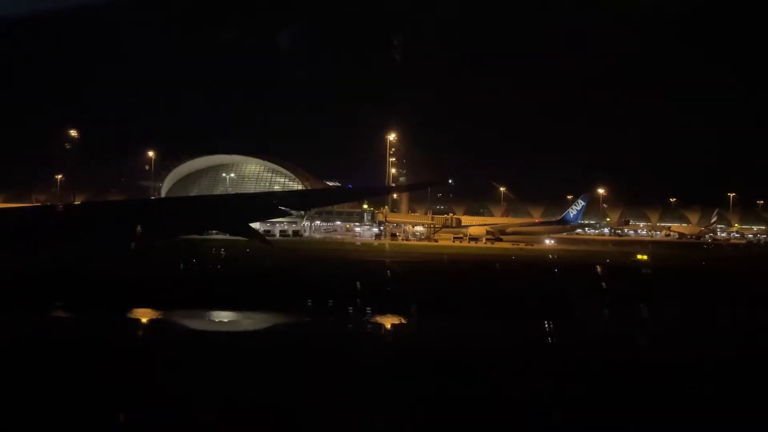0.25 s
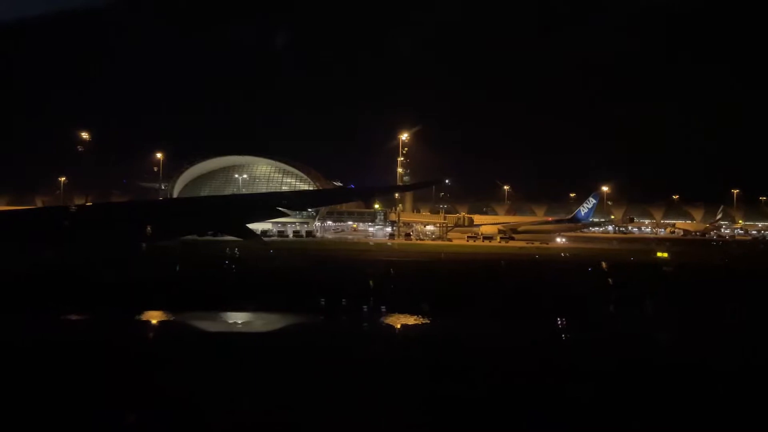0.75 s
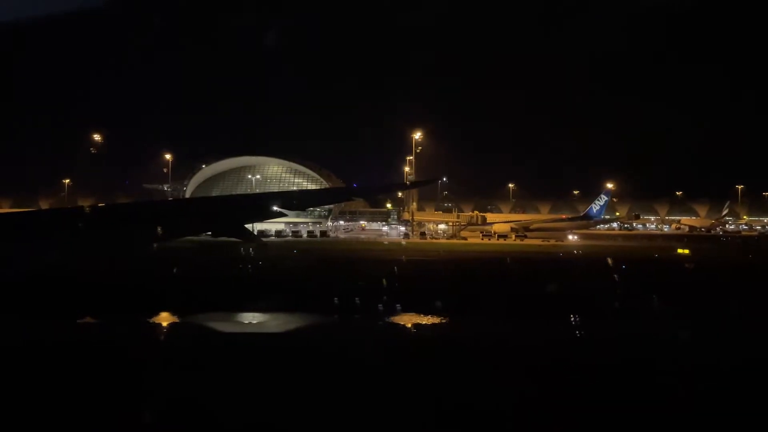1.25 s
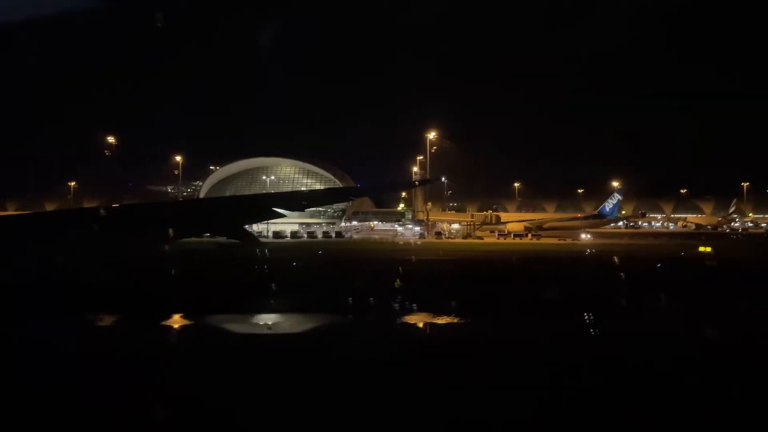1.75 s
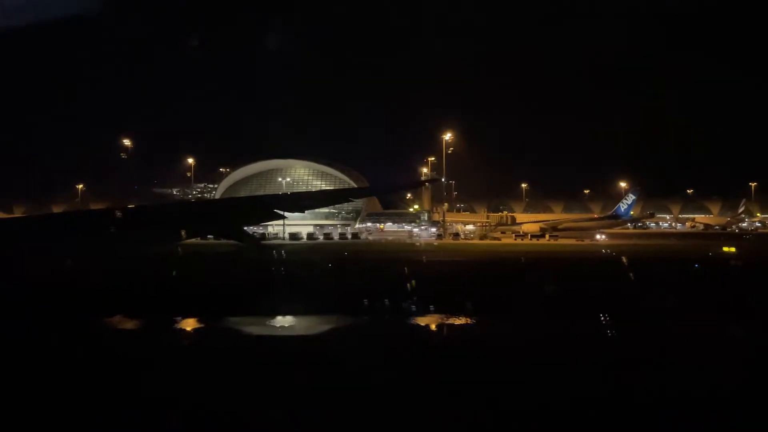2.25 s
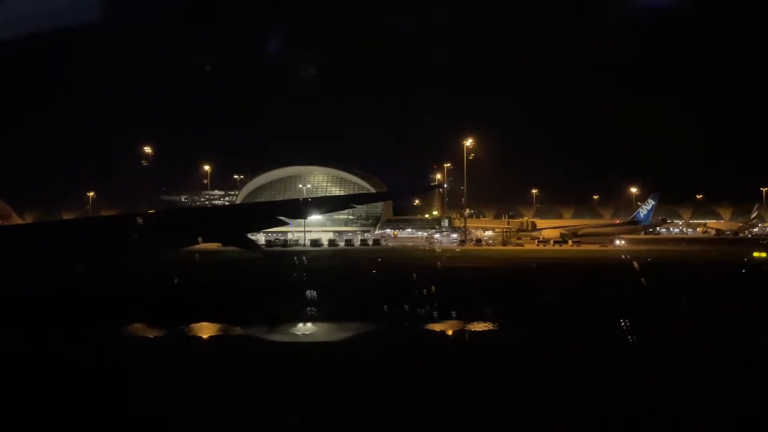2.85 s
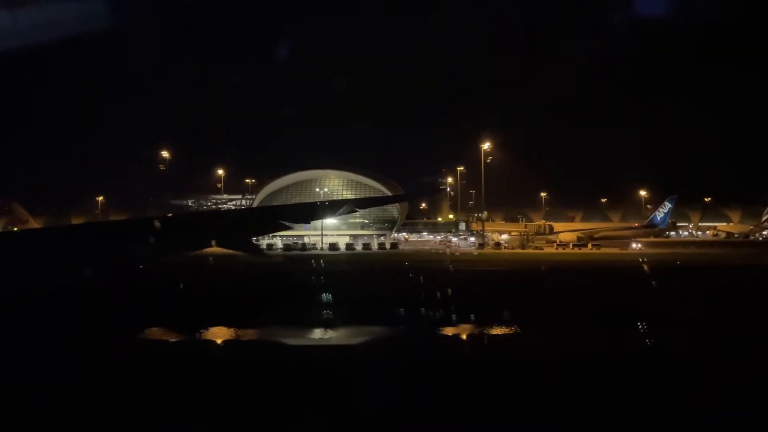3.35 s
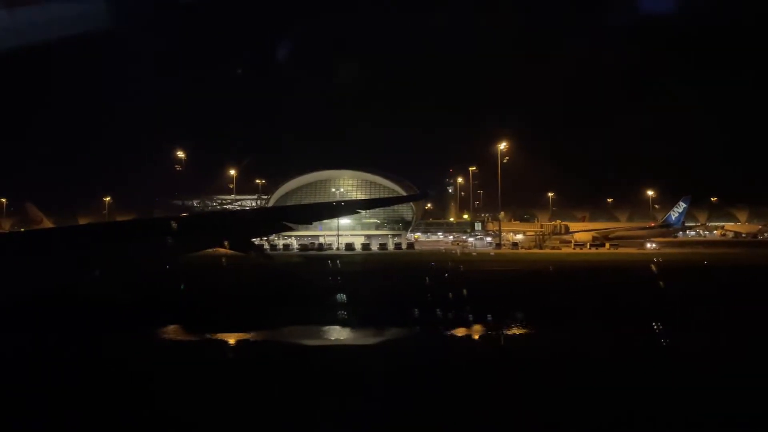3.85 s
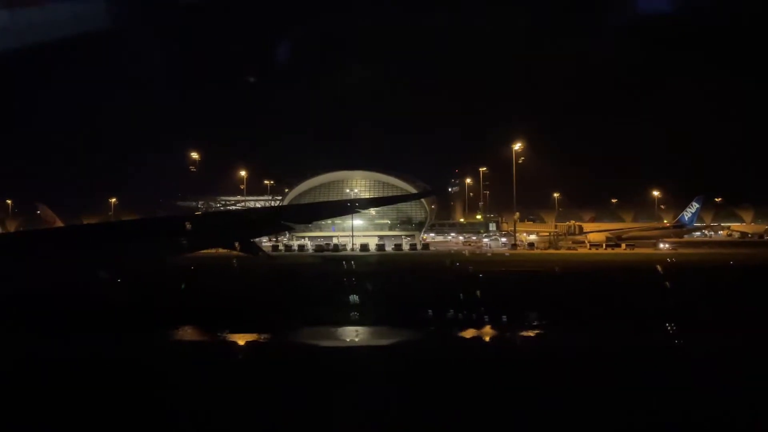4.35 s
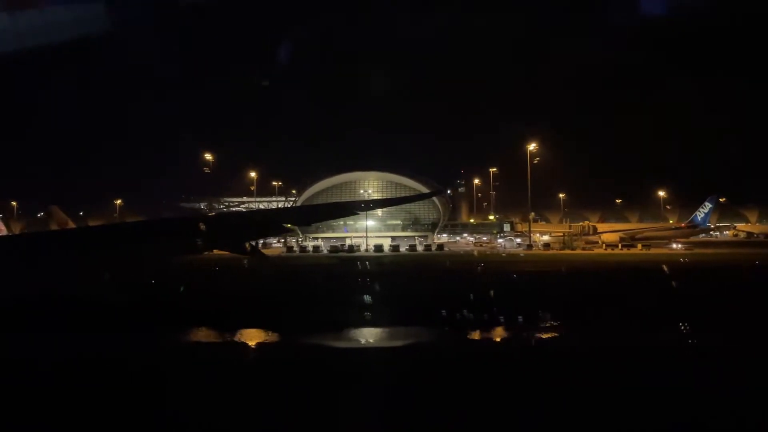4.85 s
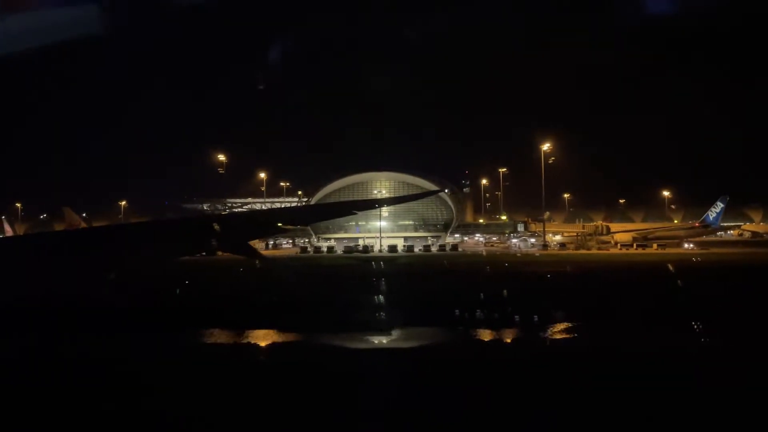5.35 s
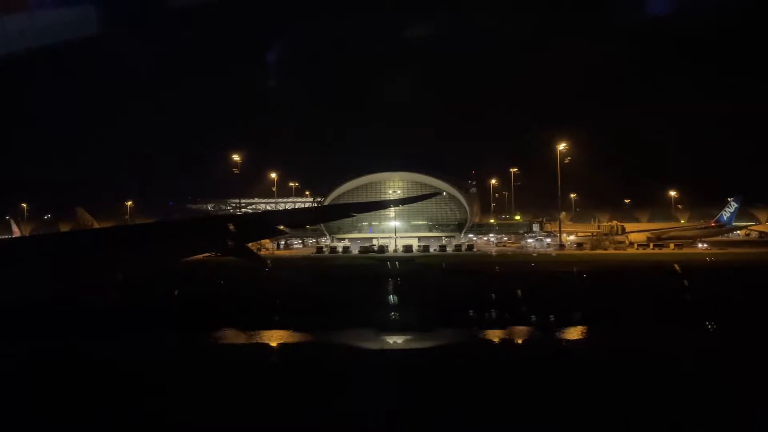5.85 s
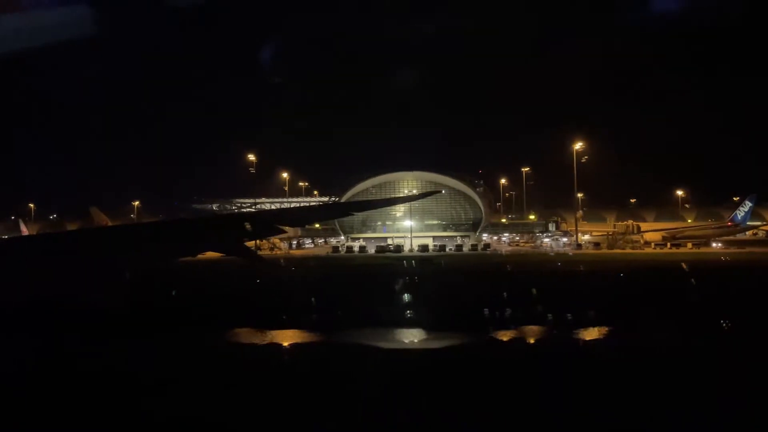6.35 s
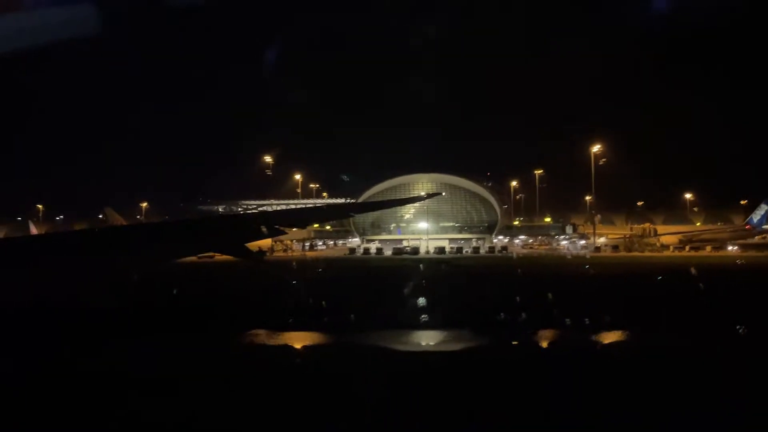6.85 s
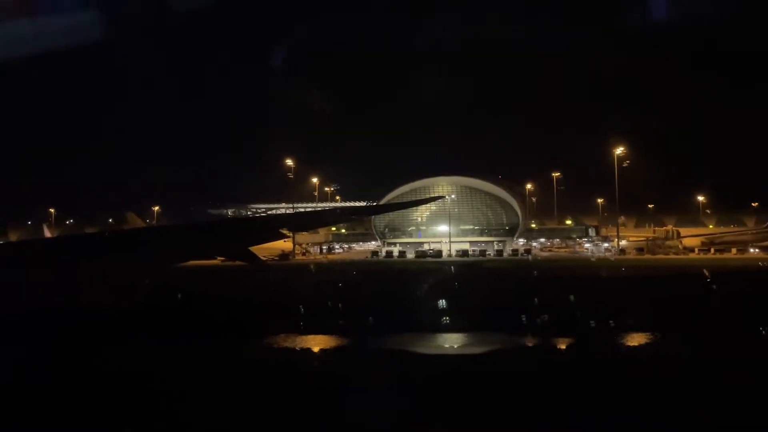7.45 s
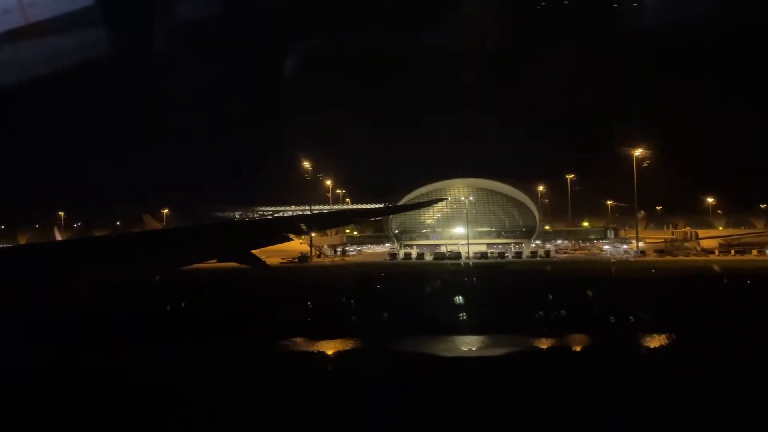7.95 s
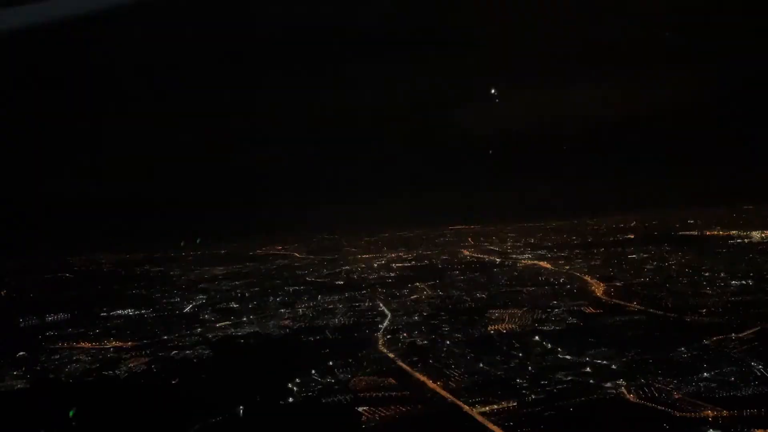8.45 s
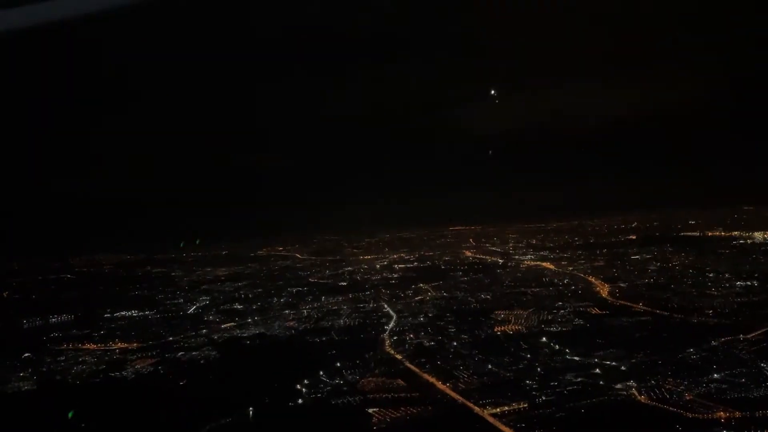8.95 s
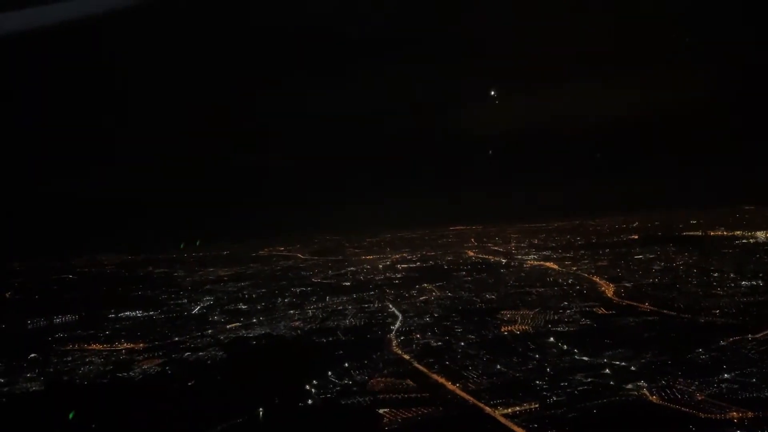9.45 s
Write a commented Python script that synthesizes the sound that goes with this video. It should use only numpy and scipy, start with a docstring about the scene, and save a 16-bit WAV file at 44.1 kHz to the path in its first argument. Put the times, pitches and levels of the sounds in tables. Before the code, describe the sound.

Heard from a window seat in a jet cabin: tyres rumble steadily and thud over pavement joints, two idling engines hum in a slow beat, pumps drone on the right and vents hiss. Rough pavement briefly rattles the trim. Near the end a click cuts abruptly to the climb, a far louder, buffeting low roar with thin whine. The stereo microphone sits inside the cabin.

```python
"""Airliner window seat, taxi and climb

A jet airliner taxis: wheels rumble and thud over joints, two idling engines hum in a slow beat, pumps drone to
the right, vents hiss and rough pavement shakes the trim. With a click the scene jumps to the climb: a buffeting
roar under thin fan whine. Shaped noise, coloured by the cabin, makes rumble, roar, hiss and rustle; wavering
sines make the rotating parts and low swells; envelopes place the thuds, rattles, squeaks and ticks."""
import sys
import numpy as np
from scipy import signal
from scipy.fft import rfft, irfft
from scipy.io import wavfile
from scipy.ndimage import uniform_filter1d

SR = 44100
rng = np.random.default_rng(int(sys.argv[2]) if len(sys.argv) > 2 else 0)


def digitize_waveform(pressure):
    """Quantize a signal to 16-bit integers and store it at the path in sys.argv[1].

    Rows of a 2-D input are taken as channels; values are limited to [-1, 1].
    """
    field = np.atleast_2d(pressure).T
    bounded = np.clip(field, -1, 1)
    quanta = np.round(bounded * 32767).astype(np.int16)
    wavfile.write(sys.argv[1], SR, quanta)


N = 427329
T = np.arange(N) / SR  # s
HZ = np.fft.rfftfreq(N, 1 / SR)
JUMP_S = 8.4143  # taxi gives way to climb
RATTLE_RISE_S, RATTLE_DECAY_S = 0.016, 0.023


def gain_of(db):
    """Decibels to amplitude."""
    return 10 ** (np.asarray(db) / 20)


def evened(x):
    """Scales to rms 1."""
    return x / np.sqrt(np.mean(x ** 2) + 1e-20)


def read(points, column=1):
    """One column of a frequency table, interpolated on a log frequency axis."""
    table = np.array(points, float)
    return np.interp(np.log(HZ + 1), np.log(table[:, 0] + 1), table[:, column])


def drift(rate_hz):
    """Slow random wandering of rms 1: noise behind a Gaussian low-pass."""
    count = 2048
    hz = np.fft.rfftfreq(count, T[-1] / count)
    lowpass = np.exp(-(hz / rate_hz) ** 2)
    slow = irfft(rfft(rng.standard_normal(count)) * lowpass, count)
    return evened(np.interp(T, np.linspace(0, T[-1], count), slow))


def swell(start, hold, rise, decay):
    """An envelope that is fully up at start, holds, then dies away exponentially (all in s)."""
    attack = np.clip((T - start) / rise + 1, 0, 1)
    return attack * np.exp(-np.maximum(T - start - hold, 0) / decay)


def together(floor_db, envelopes):
    """Adds envelopes to a steady floor, power by power."""
    return np.sqrt(gain_of(floor_db) ** 2 + sum(envelope ** 2 for envelope in envelopes))


def beating(beat_hz, in_step_s, depth):
    """Strength of the joint note of two rotating parts that turn slightly out of step."""
    return abs(1 + depth * np.exp(2j * np.pi * beat_hz * (T - in_step_s)))


def cabin_noise(spectrum_db, lean=0.93, left_db=0., spread=0., resonant=1):
    """Noise coloured by cabin resonances at two microphones: nearly one pressure in the bass, looser above."""
    # cabin air and panel resonances and the gaps between, before resonant: [f/Hz, width/Hz, level/dB]
    cabin_modes = [(173, 8, -3), (187, 9, -7), (204, 15, 6), (229, 14, -3), (249, 9, 4.5), (260, 7, -3.5),
                   (272, 14, 3.5), (289, 9, -3.5), (357, 14, -3), (420, 14, -2), (502, 16, 1),
                   (565, 30, -1.5), (604, 24, 3), (680, 50, 1), (770, 80, -1.5), (1070, 170, -2.2),
                   (1255, 110, 2.4), (1370, 70, -1), (1660, 130, 2.2), (1855, 80, -3.2), (1990, 220, 2.4),
                   (2780, 120, -1.5)]
    # how the field reaches the microphones, before lean and spread:
    # [f/Hz, likeness 0-1, left lead/rad, left minus right/dB]
    ports = [(40, 0.998, -0.0, 0.3), (130, 0.987, 0.19, -0.6), (205, 0.96, 0.38, 1.3),
             (240, 0.96, 0.5, 0.1), (275, 0.89, 0.17, -0.7), (330, 0.85, 0.62, -5.2),
             (390, 0.79, 0.53, -2.1), (440, 0.24, 3.53, 2.3), (500, 0.45, 1.84, 6.3),
             (620, 0.44, 2.02, 5.9), (720, 0.42, 1.05, 1.6), (1020, 0.21, 3.17, 1.5),
             (1290, 0.59, 0.05, -1.2), (1550, 0.15, 0.13, 0.1), (1800, 0.22, 0.23, -6.0),
             (2080, 0.44, 0.05, 1.1), (2400, 0.62, 0.36, -0.7), (3200, 0.51, 0.69, -0.5),
             (4100, 0.24, 2.02, -0.6), (4900, 0.41, 0.33, -0.5), (5900, 0.09, -1.75, 0.1),
             (6600, 0.51, -2.9, -0.2), (7500, 0.89, -3.28, -0.1), (8500, 0.74, -3.9, 0.0),
             (9500, 0.63, -5.06, 0.1), (10500, 0.95, -6.23, 0.0), (12100, 0.77, -6.42, 0.1),
             (12900, 0.45, -8.13, -0.1), (14000, 0.96, -9.38, 0.0)]
    a, b = rng.standard_normal((2, len(HZ))) + 1j * rng.standard_normal((2, len(HZ)))
    modes_db = sum(db / (1 + (2 * (HZ - hz) / width) ** 2) for hz, width, db in cabin_modes)
    same, lead, balance_db = (read(ports, column) for column in range(1, 4))
    same = np.clip(same * (1 - spread), 0, 1)
    tilt = gain_of((lean * balance_db + left_db) / 2)  # standing waves favour one side
    right = (same * a + np.sqrt(1 - same ** 2) * b) * np.exp(-1j * lead)
    pair = np.array([a * tilt, right / tilt]) / np.hypot(tilt, 1 / tilt)
    return evened(irfft(pair * gain_of(spectrum_db + resonant * modes_db), N))


def steadied(x, seconds):
    """Holds the short-term power of a noise near 1, so that its swells come from its drive."""
    power = uniform_filter1d((x ** 2).mean(0), max(int(seconds * SR), 2))
    return x / np.sqrt(power + 1e-9)


def tone(hz, lead, waver, flutter):
    """A narrow note, as of a rotating part: its pitch wanders a little and its strength flutters."""
    phase = 2 * np.pi * np.cumsum(hz * (1 + waver * drift(2.95))) / SR
    strength = 1 + flutter * (drift(4) + 1j * drift(4))  # turbulence
    ears = np.exp(1j * np.array([phase, phase - lead]))
    return evened((strength * ears).real)


def tones(table, waver, flutter):
    """Several rotating parts together."""
    return sum(gain_of(db) * tone(hz, lead, waver, flutter) for hz, db, lead in table)


def wheels(tyres_db=-37.0, smooth_boom_db=-38):
    """Tyres rumble steadily; joints and rough stretches make the landing gear boom and the hull drone."""
    # tyre rumble: [f/Hz, level/dB per Hz]
    tyre_spectrum = [(15, -35), (21, -6), (30, -1), (43, -16), (80, -2), (100, -5), (122, -1), (155, -7.5),
                     (185, -4), (230, -17.5), (400, -44), (2000, -89)]
    # landing gear boom: [f/Hz, level/dB per Hz]
    gear_spectrum = [(20, -36), (42, -4.5), (52, -4.5), (62, 1), (72, -3), (86, -13.5), (130, -33),
                     (600, -102)]
    # hull drone on rough pavement: [f/Hz, level/dB per Hz]
    hull_spectrum = [(120, -1), (210, 0.5), (310, -3.5), (380, -5.5), (500, -11), (900, -31), (3000, -60)]
    # pavement joints that thud through the gear: [t/s, level/dB]
    bumps = [(0.86, -30), (1.72, -28.5), (1.89, -28.5), (2.43, -35), (2.88, -30), (3.05, -37), (3.58, -45),
             (4.24, -34), (4.41, -37), (5.13, -35), (5.43, -28), (5.7, -37), (6.09, -32), (6.55, -37),
             (6.72, -27), (6.93, -29), (7.17, -29), (7.42, -27), (7.8, -28.5), (8.18, -31)]
    rumble = gain_of(tyres_db) * steadied(cabin_noise(read(tyre_spectrum)), seconds=0.16)
    thuds = [gain_of(db) * swell(s, 0, rise=0.028, decay=0.1) for s, db in bumps]
    jolting = together(smooth_boom_db, thuds + [roughness(column=2)])
    boom = jolting * steadied(cabin_noise(read(gear_spectrum)), seconds=0.11)
    drone = roughness(column=3) * steadied(cabin_noise(read(hull_spectrum)), seconds=0.17)
    return rumble + drone + boom


def roughness(column):
    """Envelope of the rough pavement, at the levels in one column of its table."""
    # rough stretches: [t/s, length/s, gear boom level/dB, hull drone level/dB, trim rustle level/dB]
    rough_patches = [(0.973, 0.15, -55, -53, -52), (6.586, 0.26, -32.5, -36.5, -55.5),
                     (6.923, 0.3, -39, -37, -53)]
    power = 0
    for patch in rough_patches:
        envelope = swell(patch[0], patch[1], rise=0.044, decay=0.069)
        power = power + (gain_of(patch[column]) * envelope) ** 2
    return np.sqrt(power)


def idling_engines(exhaust_db=-34.0):
    """Exhaust noise that surges slightly with each wheel turn, the hum of the shafts and a faint whine."""
    # exhaust noise: [f/Hz, level/dB per Hz]
    exhaust_spectrum = [(110, -14.5), (180, -6.5), (215, -1.5), (255, -3), (300, -2), (345, -8), (375, -10),
                        (435, -14), (500, -15), (570, -22.5), (690, -22), (790, -26.5), (1100, -36.5),
                        (4000, -85)]
    # steady engine tones: [f/Hz, level/dB, left lead/rad]
    idle_whine = [(30.8, -48, 0.11), (388, -60, 1.3), (468, -69, 1.6), (540, -69, 2.1), (904, -76, 1.3)]
    wheel_rate_hz, trough_s = 1.615, 3.92
    surge_db = -0.3 * np.cos(2 * np.pi * wheel_rate_hz * (T - trough_s))
    exhaust = gain_of(exhaust_db + surge_db) * steadied(cabin_noise(read(exhaust_spectrum)), seconds=0.25)
    return exhaust + shaft_hum() + tones(idle_whine, waver=0.002, flutter=0.7)


def shaft_hum():
    """The two engines' shafts drift in and out of step over several seconds."""
    hum = tone(hz=132.9, lead=.21, waver=.0012, flutter=.07)
    return gain_of(-41.2) * beating(beat_hz=.17, in_step_s=3.5, depth=.47) * hum


def noise_swells(half_width_s=0.06):
    """Brief narrow low swells in the noise, each around one pitch."""
    # swells: [t/s of the crest, f/Hz, level/dB]
    brief_swells = [(.49, 248, -40), (.6, 204, -33.5), (1.24, 204, -38.5), (1.42, 205, -36.5),
                    (2.35, 279, -35.5), (2.36, 206, -33), (2.77, 207, -36.5), (3.62, 270, -35.5),
                    (4.14, 206, -35.5), (4.37, 281, -38.5), (5.3, 248, -35.5), (5.47, 214, -37),
                    (6.25, 267, -37.5), (6.81, 206, -40), (7.13, 268, -34.5)]
    out = 0
    for s, hz, db in brief_swells:
        envelope = np.exp(-((T - s) / half_width_s) ** 2)
        out = out + gain_of(db) * envelope * tone(hz, lead=0.25, waver=0.0058, flutter=0.083)
    return out


def pump_hum(growth_db_per_s=.6):
    """Two hydraulic pumps drone somewhere to the right, beating about once a second and slowly growing."""
    # starting level before the beat, one row each for left and right: [level/dB]
    pump_db = [
        [-51.7],
        [-44.7],
    ]
    level = gain_of(np.array(pump_db) + growth_db_per_s * T)
    drone = level * tone(hz=321.3, lead=.6, waver=.0003, flutter=.08)
    return beating(beat_hz=0.884, in_step_s=4.45, depth=0.25) * drone


def climbing_engines(buffet_db=0.4, boom_share=.3):
    """Jet roar booming in the hull, buffeted by the airflow, with engine tones on top."""
    # rush of the jet: [f/Hz, level/dB per Hz]
    climb_spectrum = [(15, -46), (26, -37), (38, -15.5), (50, -9.5), (70, -8), (97, -4.5), (135, 0),
                      (158, -1.5), (180, -3.5), (205, -13.5), (240, -12.5), (330, -19), (470, -27.5),
                      (950, -44.5), (6000, -92.5)]
    # roar as the airflow buffets the hull: [t/s, level/dB]
    roar_level = [(8.45, -21.5), (8.53, -19.5), (8.6, -21.5), (8.75, -20), (8.89, -20), (8.94, -23.5),
                  (9.05, -20), (9.15, -19.5), (9.26, -21.5), (9.46, -19.5), (9.57, -22), (9.67, -19)]
    # steady engine tones: [f/Hz, level/dB, left lead/rad]
    climb_whine = [(37.7, -39, 0), (202, -42, .3), (642, -64, 1.6), (1136, -71, .5), (1416, -73, .5),
                   (1873, -77, .5), (2799, -82, .5), (4716, -82, .5), (5895, -83, 1)]
    rush = cabin_noise(read(climb_spectrum), lean=0.38, left_db=0.8, spread=0.02, resonant=.45)
    rush = steadied(rush, seconds=0.07)
    # the hull's boom wanders around one pitch, a little stronger on the left
    boom = gain_of([[.6], [-.6]]) * tone(hz=134, lead=.2, waver=.075, flutter=.3)
    # boom_share is a share of the power
    roar = steadied(np.sqrt(1 - boom_share) * rush + np.sqrt(boom_share) * boom, seconds=.045)
    level_db = np.interp(T, *np.transpose(roar_level)) + buffet_db * drift(15)
    return gain_of(level_db) * roar + fan_beats() + tones(climb_whine, waver=0.0012, flutter=0.25)


def fan_beats():
    """The two engines turn slightly out of step, so their notes swell and fade, mostly on the left."""
    # joint notes: [f/Hz, level before beat and balance/dB, beat rate/Hz, in step at t/s, depth 0-1]
    climb_beats = [(855.5, -58, 1.68, 8.65, .95), (705.5, -57, 2.8, 9.0, .5)]
    notes = 0
    for hz, db, rate, in_step, depth in climb_beats:
        note = tone(hz, lead=1.63, waver=0.0012, flutter=0.18)
        notes = notes + gain_of(db) * beating(rate, in_step, depth) * note
    return gain_of([[1.2], [-1.8]]) * notes


def ventilation(climbing, taxi_db=-50.0, climb_db=-48.5, fan_hz=2358.3):
    """Air from the vents: on the ground the ducts whine and the fan whistles; the climb leaves mostly hiss."""
    # vent hiss in the taxi: [f/Hz, level/dB per Hz]
    taxi_vents = [(300, -5.5), (1000, 1), (1270, -0.5), (1500, -1), (1750, -1.5), (1850, -4.5), (2450, -10),
                  (3100, -10.5), (4300, -15), (5100, -15.5), (5950, -12), (6800, -21), (8500, -24),
                  (11000, -32.5), (15000, -37)]
    # vent hiss in the climb: [f/Hz, level/dB per Hz]
    climb_vents = [(300, -0.5), (1100, 2), (1700, -2.5), (2400, -11.5), (2900, -10.5), (3400, -12),
                   (3800, -15), (5300, -15.5), (5920, -15.5), (6250, -16.5), (7500, -32), (8000, -26.5),
                   (11000, -32), (15000, -40)]
    # breathy, wavering duct whines: [f/Hz, level/dB, left lead/rad, waver share]
    duct_whines = [(1255, -69.5, .1, .022), (1680, -69, .1, .02), (7095, -81, 3, .0025)]
    # ventilation fan: [multiple of fan_hz, level/dB, left lead/rad]
    fan_overtones = [(1, -76.5, 1.1), (2, -85, 5.3)]
    # thin whistles of the air nozzles: [f/Hz, level/dB, left lead/rad]
    squeal = [(8123, -90, 2.7), (10255, -96, 0), (11795, -97, 0), (12334, -101, 0)]
    hiss = gain_of(taxi_db + 0.31 * drift(10.0)) * cabin_noise(read(taxi_vents))
    whine = sum(gain_of(db) * tone(hz, lead, waver, flutter=3) for hz, db, lead, waver in duct_whines)
    fan_table = [(multiple * fan_hz, db, lead) for multiple, db, lead in fan_overtones]
    fan = tones(fan_table, waver=0.00077, flutter=0.8)
    grounded = hiss + whine + fan
    aloft = gain_of(climb_db) * cabin_noise(read(climb_vents), spread=0.25, resonant=0.31)
    whistles = tones(squeal, waver=0.00022, flutter=0.57)
    return (1 - climbing) * grounded + climbing * aloft + whistles


def high_hiss():
    """For two stretches of the taxi the high hiss is lifted near 6 and 9 kHz."""
    # lifted hiss: [f/Hz, level/dB per Hz]
    high_spectrum = [(4500, -22), (5800, 6), (7300, -18), (8400, -11), (9100, 5), (9900, -7), (12000, -40)]
    # stretches of brighter hiss: [t/s, length/s, level/dB]
    bright_stretches = [(0, 1.25, -77), (7.7, .65, -75)]
    lift = sum(gain_of(db) * swell(s, length, rise=.12, decay=.12) for s, length, db in bright_stretches)
    return lift * cabin_noise(read(high_spectrum))


def fittings(smooth_rustle_db=-63, uneven_db=4.5):
    """The trim rustles faintly throughout; rough pavement shakes it into louder rustle, rattles and squeaks."""
    # trim rustle: [f/Hz, level/dB per Hz]
    trim_spectrum = [(200, -10), (500, 0), (900, -.5), (1500, -7.5), (2300, -14.5), (4000, -25),
                     (7000, -33), (14000, -50)]
    # brief rattles, before the uneven drift: [t/s, level/dB]
    rattle_hits = [(6.59, -47.5), (6.64, -48.5), (6.948, -46), (7.04, -51), (7.08, -54), (7.145, -45),
                   (7.225, -45)]
    # thin squeaks: [t/s, length/s, level/dB]
    squeaks = [(7.168, .05, -75), (7.355, .035, -75), (7.455, .04, -78)]
    rattles = [gain_of(db) * swell(s, 0, RATTLE_RISE_S, RATTLE_DECAY_S) for s, db in rattle_hits]
    shaking = together(smooth_rustle_db, rattles + [roughness(column=4)])
    rustle = shaking * gain_of(uneven_db * drift(25)) * cabin_noise(read(trim_spectrum))
    rubbing = sum(gain_of(db) * swell(s, length, RATTLE_RISE_S, RATTLE_DECAY_S) for s, length, db in squeaks)
    return rustle + rubbing * tone(hz=12850, lead=1.5, waver=.004, flutter=.4)


def ticks(fall_db_per_octave=7):
    """Now and then a plastic joint slips: a decaying burst of noise centred near its own pitch."""
    # noise of the plastic: [f/Hz, level/dB per Hz]
    plastic_spectrum = [(1000, -10), (4000, 1), (7700, 0), (10000, -6), (15000, -10)]
    # creaks and ticks: [t/s, level/dB, decay/s, f/Hz]
    slips = [(1.003, -64, .008, 4000), (1.125, -61, .012, 7000), (1.718, -68, .006, 8000),
             (6.947, -57, .015, 3600), (7.073, -63, .006, 9500), (7.227, -58, .018, 7200),
             (8.739, -52, 0.0044, 6000)]
    plastic = rfft(cabin_noise(read(plastic_spectrum)))
    out = np.zeros((2, N))
    for s, db, decay, hz in slips:
        octaves_away = abs(np.log2((HZ + 1) / hz))
        ring = evened(irfft(plastic * gain_of(-fall_db_per_octave * octaves_away), N))
        out += gain_of(db) * (T >= s) * np.exp(-abs(T - s) / decay) * ring
    return out


def jump_click(step_db=-23, decay_s=0.0013):
    """A click marks where the scene changes from taxi to climb, then decays."""
    return gain_of(step_db) * (T >= JUMP_S) * np.exp(-abs(T - JUMP_S) / decay_s)


def scene():
    """Taxi, then climb, with ventilation and fittings running through both."""
    climbing = np.clip((T - JUMP_S) / 0.0034, 0, 1)  # crossfade of 3.4 ms
    taxi = wheels() + idling_engines() + noise_swells() + pump_hum() + high_hiss()
    taxi_then_climb = (1 - climbing) * taxi + climbing * climbing_engines()
    return taxi_then_climb + ventilation(climbing) + fittings() + ticks() + jump_click()


def record(dry, edge_hz=15700):
    """The recorder's band limit: a steep low-pass."""
    lowpass = signal.firwin(511, edge_hz, window=("kaiser", 9), fs=SR)
    return signal.oaconvolve(dry, lowpass[None], "same")


dry = scene()
out = record(dry)
digitize_waveform(out)
```